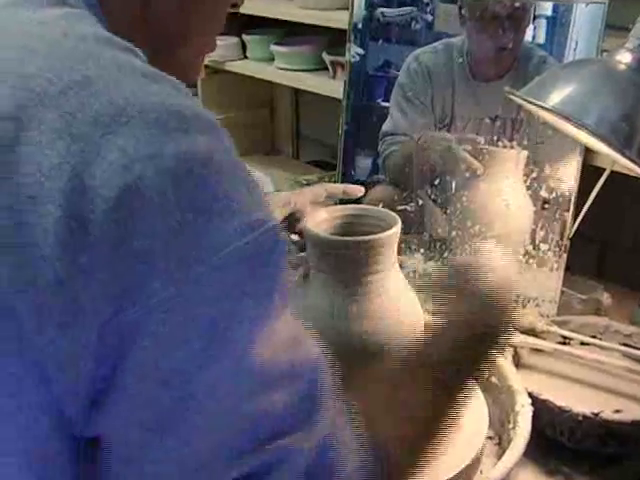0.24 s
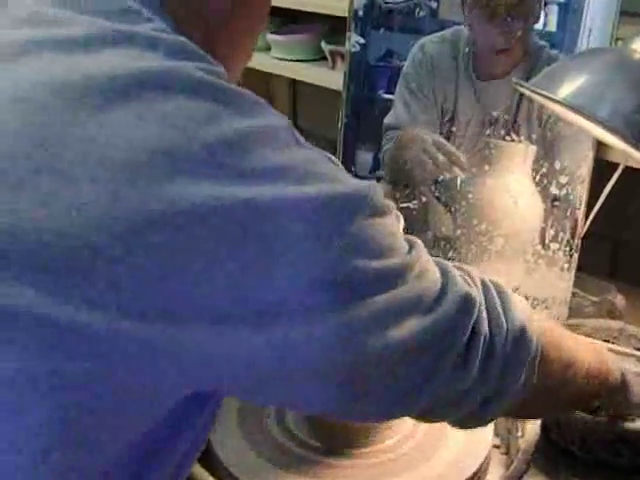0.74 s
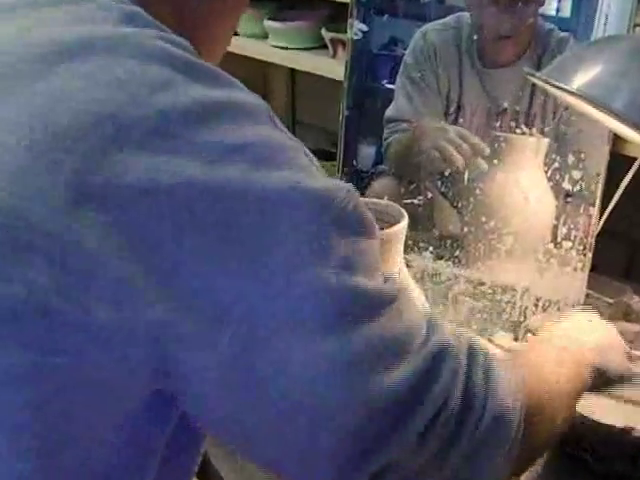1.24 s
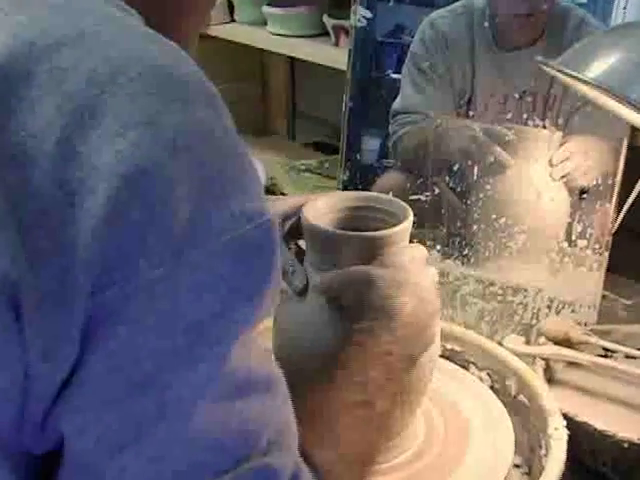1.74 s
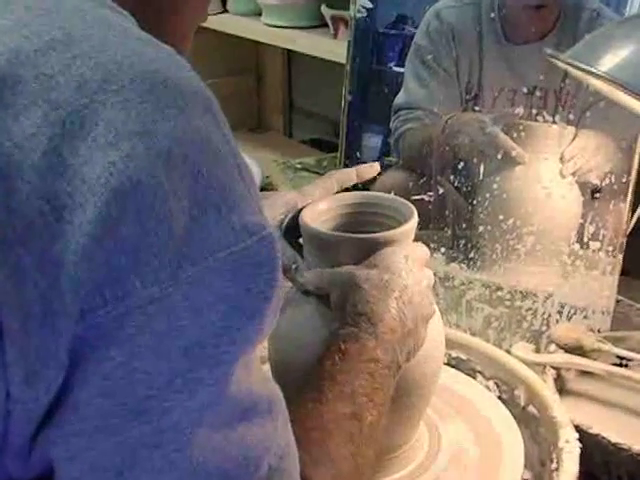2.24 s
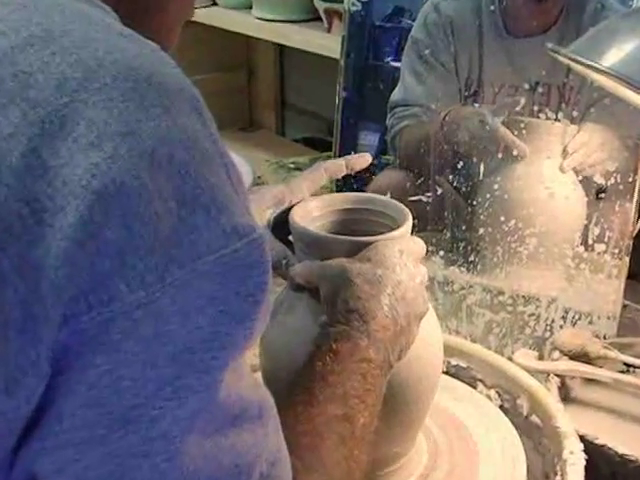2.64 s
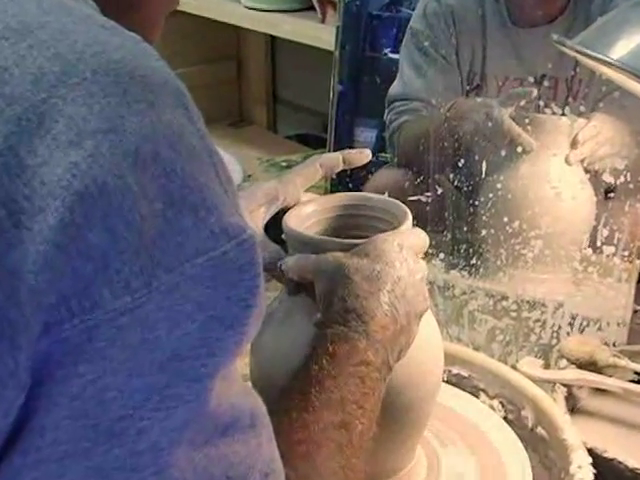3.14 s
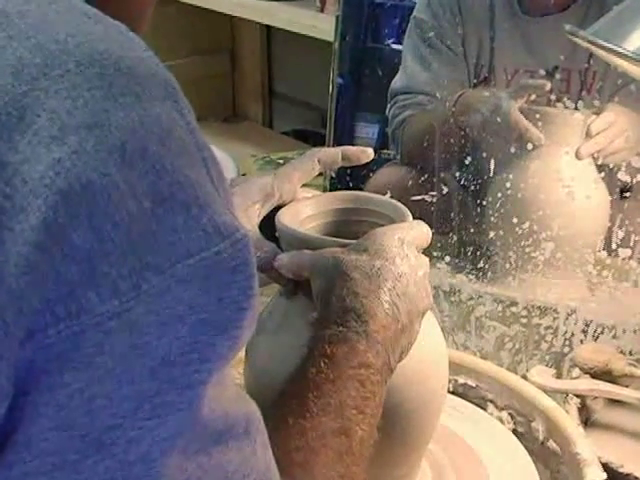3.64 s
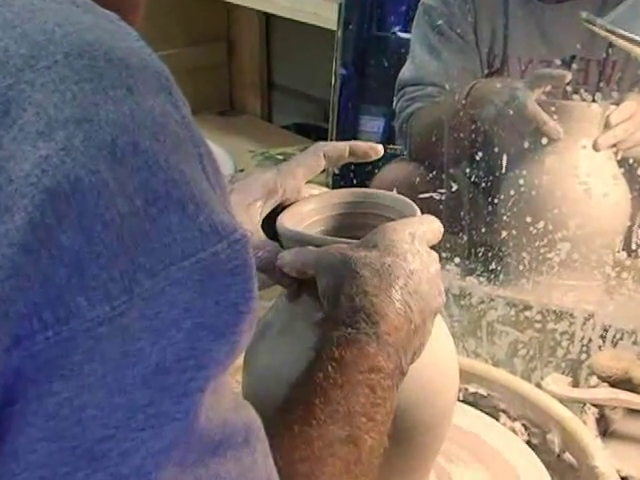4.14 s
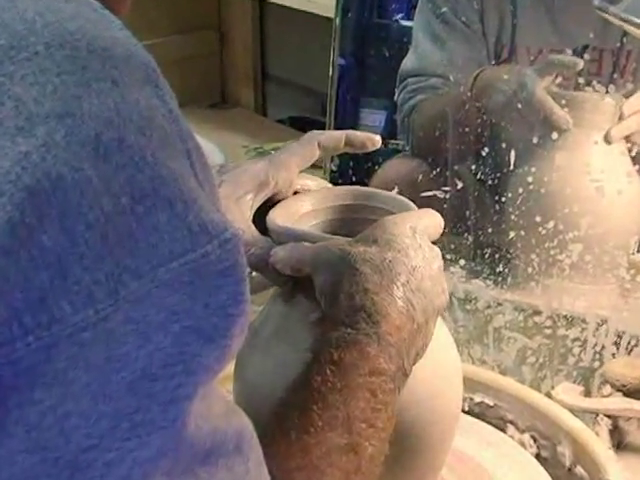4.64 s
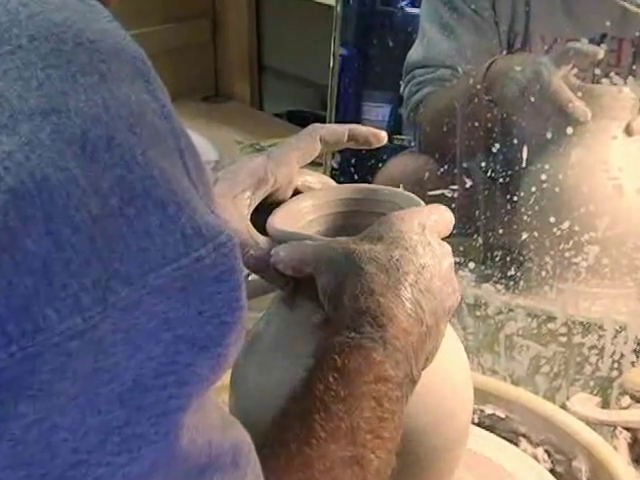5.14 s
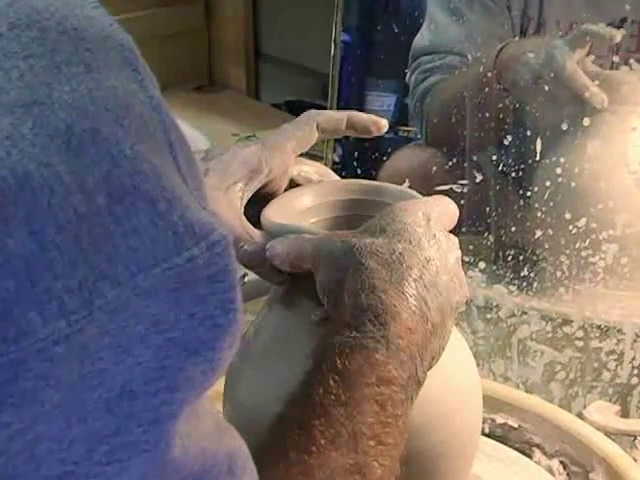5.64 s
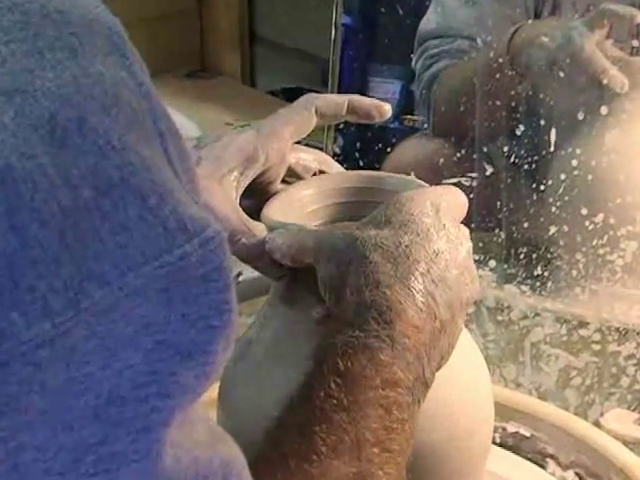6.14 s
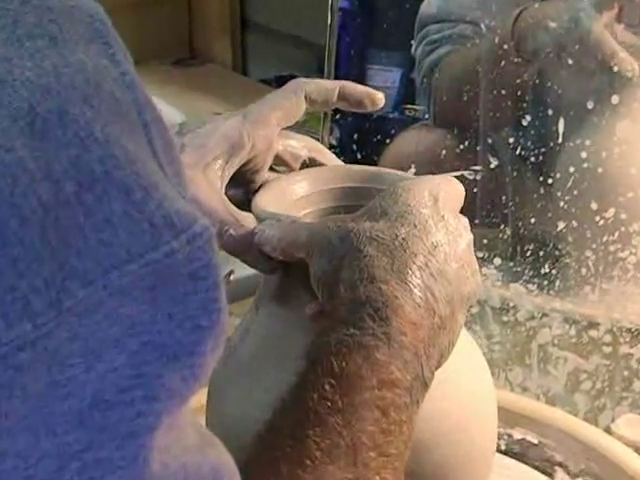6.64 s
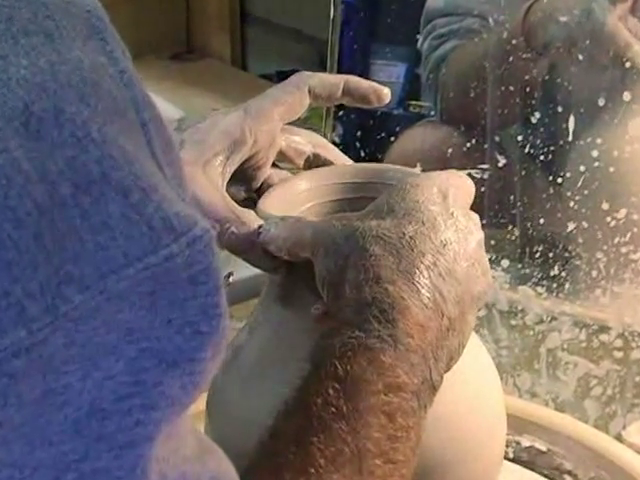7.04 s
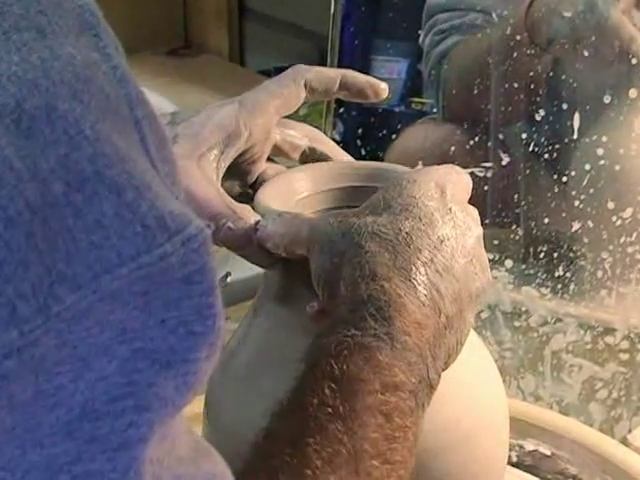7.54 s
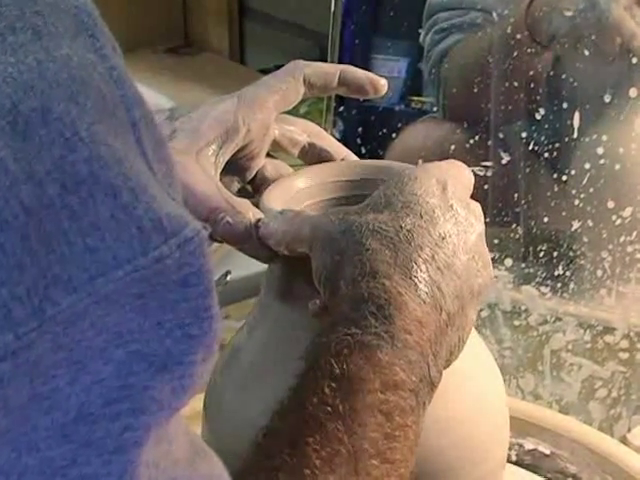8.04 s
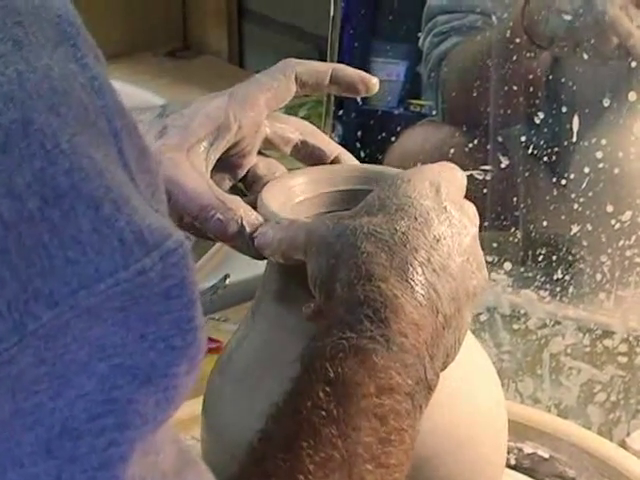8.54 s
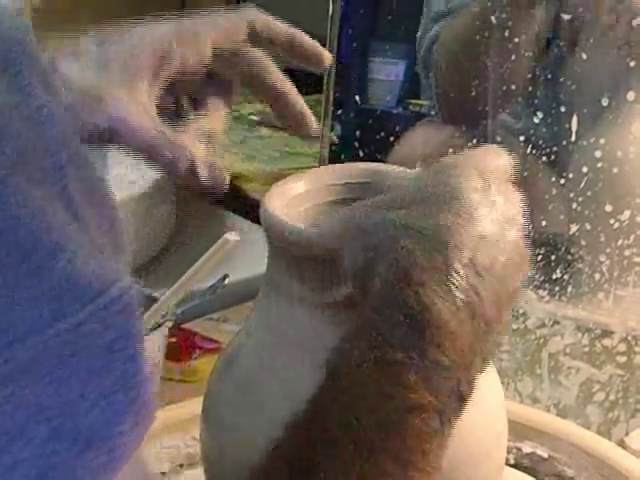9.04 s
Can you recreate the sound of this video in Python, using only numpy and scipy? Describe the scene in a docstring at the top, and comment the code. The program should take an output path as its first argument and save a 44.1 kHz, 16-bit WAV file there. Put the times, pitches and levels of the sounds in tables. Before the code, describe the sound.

Constant low motor hum and gentle belt rumble in a small studio, with brief cloth rustles, two dull wooden knocks early and tiny wet clicks.

```python
"""A steady hum and rumble fill a small studio, with a rustle of cloth, two knocks and soft wet ticks.
An electric potter's wheel makes the hum: its motor sings on multiples of twice the mains frequency.
Its drive shakes the frame, which now and then shudders; belt and bearings add a broad rush.
The potter leans aside and back with rustling sleeves, knocks a wooden tool and touches wet clay.
A tape camera close by adds hiss, a faint whine and a soft chirr."""
import sys
import numpy as np
from scipy.fft import rfft, irfft, next_fast_len
from scipy.io import wavfile
from scipy.ndimage import map_coordinates

SR = 44100
rng = np.random.default_rng(int(sys.argv[2]) if len(sys.argv) > 2 else 0)


def generate_wav(signal):
    """Clip the signal to [-1, 1] and save it as 16-bit WAV at the path in sys.argv[1]."""
    frames = np.transpose(np.atleast_2d(signal))
    scaled = np.clip(frames, -1, 1) * 32767
    pcm = np.round(scaled).astype(np.int16)
    wavfile.write(sys.argv[1], SR, pcm)


N = 409248

# the potter leans out to the side and back: t/s, lean (0 to 1)
LEAN = [(.1, 0), (.7, 0.74), (1.1, 0.89), (1.45, 0.66), (1.8, 0)]
# the wheel judders in its frame: t/s, ring level/dB before a shared trim, bell width/s, hum change/dB
JUDDER = [(1.09, -46, 0.02, 1.5), (1.963, -46, 0.067, -1), (2.31, -48, 0.013, 3.5), (3.59, -45, 0.037, -2),
          (4.063, -51, 0.033, -1.5), (4.49, -48, .012, -3.5), (4.528, -51, 0.011, 4), (5.878, -47, .05, 0),
          (8.5, -44, 0.074, -1)]


def amp(db):
    """Turn decibels into gain."""
    return 10 ** (np.asarray(db) / 20)


def unit(x):
    """Scale to rms 1."""
    return x / np.sqrt(np.mean(x ** 2) + 1e-20)


def clock():
    """Time of each sample in seconds."""
    return np.arange(N) / SR


def along(points, hz):
    """Gain read from (f/Hz, level/dB) points joined on a log frequency axis."""
    f, db = np.transpose(points)
    return amp(np.interp(np.log(hz + 1), np.log(f + 1), db))


def curves(rows):
    """One value per sample for each column after the time."""
    s, *cols = np.transpose(rows)
    return [np.interp(clock(), s, c) for c in cols]


def wobble(rate):
    """A smooth random curve with the given number of knots a second."""
    knots = rng.standard_normal(int(N * rate / SR) + 4)
    return map_coordinates(knots, [clock() * rate])


def filtered(x, response):
    """Filter x by a gain that depends on frequency."""
    m = next_fast_len(N + SR // 2)  # spare room at the end
    spectrum = rfft(x, m) * response(np.fft.rfftfreq(m, 1 / SR))
    return irfft(spectrum, m)[:N]


def noise(response):
    """Noise whose density per Hz is the response."""
    return filtered(rng.standard_normal(N) * np.sqrt(SR / 2), response)


def hump(hz, centre, width):
    """Gain of a resonance: 1 at the centre, half of that one width away."""
    return 1 / (1 + ((hz - centre) / width) ** 2)


def tone(hz):
    """A sine of rms 1 and random phase."""
    return np.sqrt(2) * np.sin(2 * np.pi * (hz * clock() + rng.random()))


def swells(rows):
    """Sum of bell-shaped envelopes from (t/s, level/dB, width/s) rows."""
    return sum(amp(db) * np.exp(-.5 * ((clock() - s) / width) ** 2) for s, db, width in rows)


def surges():
    """Level change of the hum in dB while the wheel judders."""
    return sum(change_db * swells([(s, 0, width)]) for s, _, width, change_db in JUDDER)


def motor(mid_db=3.5, upper_db=3.5, main_db=0.86, flutter_db=.25, waver_db=.5, wander_db=0.5):
    """Iron flexes twice a mains cycle; the housing favours its harmonics 2, 8 and 11, leaning lifts 2 and 8."""
    # slow drift of the main hum: t/s, level/dB before the changes below
    hum_drift = [(0, -40), (1.7, -39), (2.8, -41.5), (4, -40.5), (4.3, -40.5), (6.7, -38.5), (9, -38.4),
                 (9.28, -41)]
    # highest strong line: t/s, level/dB before the changes below
    top_line = [(0, -67.5), (.3, -66.5), (.7, -69.5), (1.55, -67), (2.5, -66.5), (4.3, -70), (7.8, -69.5),
                (9, -66.5), (9.28, -71.5)]
    # weaker lines: multiple of twice the mains, level/dB against the mean of the two upper lines
    buzz_lines = [(6, -4.5), (7, -1.5), (12, -14.5), (14, -17)]
    # steady low lines of motor and drive: f/Hz, level/dB rms before a slight waver
    drone_lines = [(30, -73), (36, -73.5), (59, -63.5), (90, -65.5), (120, -65.5), (183, -69), (277, -65.5),
                   (360, -58), (480, -62.5)]
    flex_hz = 2 * 60  # twice the mains frequency
    lean_hum_db, lean_mid_db = 3.5, 5  # leaning opens the path from the motor
    (lean,), (hum_db,), (top_db,) = curves(LEAN), curves(hum_drift), curves(top_line)

    dip_db = -5 * swells([(2.85, 0, .07)])  # the upper lines dip briefly
    mid_line_db = -68.5 + lean_mid_db * lean + dip_db
    top_db = top_db + dip_db + wander_db * wobble(3.9)

    def line(db, order):
        """One harmonic of the flexing at a changing level."""
        return amp(db) * tone(order * flex_hz)

    hum_db = hum_db + lean_hum_db * lean + surges() + main_db + flutter_db * wobble(20)
    hum = line(hum_db, order=2)
    middle = line(mid_line_db + mid_db + waver_db * wobble(4.3), order=8)
    top = line(top_db + upper_db + waver_db * wobble(5), order=11)
    mean_db = (mid_line_db + top_db) / 2
    buzz = sum(line(mean_db + db + waver_db * wobble(7), round(k)) for k, db in buzz_lines)
    drone = sum(amp(db + waver_db * wobble(12)) * tone(hz) for hz, db in drone_lines)
    return hum + middle + top + buzz + drone


def turning(turn_hz=2.3, peak_s=.16):
    """Swings from 1 to -1 and back once in each turn of the wheel."""
    return np.cos(2 * np.pi * turn_hz * (clock() - peak_s))


def standing_waves(hz, spacing_hz=16, ripple_db=2.27):
    """The small room lifts some frequencies and hollows out their neighbours."""
    knots = rng.standard_normal(SR // 4)
    return amp(ripple_db * map_coordinates(knots, [hz / spacing_hz], mode="wrap"))


def drive(turn_db=0.55, rush_turn_db=0.44, uneven_db=0.95, grit_db=1.1):
    """Belt and bearings shake the frame, harder once a turn; their rush opens up as the potter leans."""
    # the drive bumps and shakes the frame harder: t/s, added gain/dB against the steady 1, bell width/s
    bumps = [(1.96, -1.5, .05), (2.31, -9, 0.02), (6.3, -10, 0.061)]
    # resonances of frame, wheel head and splash pan: f/Hz, width/Hz, density/dB per Hz against the rumble
    resonances = [(68.3, 17.7, -21.5), (119.5, 12, -28.5), (221.8, 32.5, -20), (267, 19, -21.5),
                  (340.7, 16.8, -15), (416.5, 22, -29.5), (485, 35, -30.5), (588.5, 11.9, -20.5),
                  (623, 23, -27.5), (1140, 9.2, -53), (1315.5, 14, -38.5)]
    # broad rush of belt and bearings: f/Hz, density/dB per Hz against the rush level
    rush_colour = [(15, -40), (45, -30), (165, -26.5), (400, -25.5), (800, -29), (1000, -34), (1330, -36),
                   (1520, -39.5), (1850, -44), (2250, -46.5), (3000, -55), (4500, -71)]
    # level of the rush: t/s, level/dB before lean, turning and grit
    rush_level = [(0, -60), (2.6, -59.5), (4, -61), (5.6, -61.5), (7.3, -60.5), (9.28, -61)]
    rumble_db, lean_rumble_db, lean_rush_db = -51.5, -0.5, 2.5
    (lean,), (rush_db,) = curves(LEAN), curves(rush_level)

    load = amp(turn_db * turning() + uneven_db * wobble(12)) * (1 + swells(bumps))
    frame = noise(lambda hz: np.sqrt(sum((amp(db) * hump(hz, c, w)) ** 2 for c, w, db in resonances)))
    rumble = load * amp(rumble_db + lean_rumble_db * lean) * frame

    rush = noise(lambda hz: along(rush_colour, hz) * standing_waves(hz))
    rush_db = rush_db + lean_rush_db * lean + rush_turn_db * turning() + grit_db * wobble(18)
    return rumble + amp(rush_db) * rush


def camera(chirr_db=-83.5, low_hz=5620, high_hz=6420, chirr_width_hz=330,
           reel_hz=10.0, roller_hz=9.6, depth_db=2.5):
    """Microphone hiss, the whine of the tape drive and a soft chirr from two small turning parts."""
    # microphone hiss: f/Hz, density/dB per Hz
    hiss_colour = [(1000, -120), (3700, -117), (5000, -115), (6200, -113.5), (8000, -114.5), (12100, -115),
                   (12600, -121), (12900, -135)]
    # whine of the tape drive: f/Hz, level/dB rms
    whine_lines = [(2697, -90.5), (5394, -81.5), (5696, -97), (6293, -89), (6743, -89), (7192, -93),
                   (7642, -95), (8092, -88), (9441, -93), (10789, -88)]
    hiss = noise(lambda hz: along(hiss_colour, hz))
    whine = sum(amp(db) * tone(hz) for hz, db in whine_lines)
    # each part rubs once a turn and, more strongly, twice a turn
    rub = sum(.5 * tone(hz) + tone(2 * hz) for hz in (reel_hz, roller_hz))

    def shell(hz):
        """Two resonances that colour the chirr."""
        return np.hypot(hump(hz, low_hz, chirr_width_hz), hump(hz, high_hz, chirr_width_hz))

    chirr = unit(noise(shell) * amp(depth_db * rub))
    return hiss + whine + amp(chirr_db) * chirr


def sleeve(grain_db=1.4, catch_db=0.9, pivot_hz=3000):
    """Cloth slides over cloth in many tiny catches; each stroke swells and fades with its own brightness."""
    # sleeve strokes: t/s, level/dB rms at the height before the catches, width/s, brightness/dB per octave
    strokes = [(.08, -71.5, 0.021, -2), (0.285, -61.5, 0.025, 1), (1.1, -78, .065, 1),
               (1.467, -65.5, .033, -1), (1.643, -69.5, .085, 2.5), (3.07, -70, .021, -3),
               (6.08, -72, .035, -4), (9.09, -68, .02, 0), (9.205, -62, 0.053, -1)]
    # colour of the cloth: f/Hz, level/dB
    cloth_colour = [(500, -15), (1500, 5.5), (2200, 4.5), (3500, -2.5), (6000, -4), (8500, -12.5),
                    (12500, -16)]
    out = np.zeros(N)
    for s, db, width, tilt_db in strokes:
        def colour(hz):
            """The cloth's colour, tilted around the pivot."""
            octaves = np.log2(np.maximum(hz, 500) / pivot_hz)
            return along(cloth_colour, hz) * amp(tilt_db * octaves)

        swell = 1 / np.cosh(np.clip((clock() - s) / width, -20, 20))
        out += amp(db) * unit(noise(colour)) * swell
    catches = unit(amp(grain_db * wobble(300) + catch_db * wobble(50)))
    return out * catches


def knocks(click_hz=2300, click_width_hz=650, click_t60=.035, thud_hz=480, thud_width_hz=220, thud_t60=0.088):
    """A light wooden tool is knocked: a dull click, a short ring and a thud of the bench."""
    # knocks as the hand takes up a tool: t/s, base level/dB, click/dB and low thud/dB against the base
    blows = [(0.471, -51, -8, -4), (.669, -54, -5, 8)]
    # ring of the tool: f/Hz, level/dB against the base, time to fall 60 dB/s
    tool_modes = [(520, -3, 0.067), (720, -3, .06), (1510, 1, 0.053), (1690, -3, .05), (2140, -12, 0.036),
                  (2490, -13, .04), (2910, -11, 0.044)]
    ring, click, thud = np.zeros((3, N))
    for s, db, click_db, thud_db in blows:
        t = np.maximum(clock() - s, 0)
        blow = amp(db) * (1 - np.exp(-t / 0.0005))  # silent before the knock, then a fast rise
        for hz, level, t60 in tool_modes:
            wave = np.sin(2 * np.pi * (hz * t + rng.random()))
            ring += blow * amp(level - 60 * t / t60) * wave
        click += blow * amp(click_db - 60 * t / click_t60)
        thud += blow * amp(thud_db - 60 * t / thud_t60)
    click_noise = unit(noise(lambda hz: hump(hz, click_hz, click_width_hz)))
    thud_noise = unit(noise(lambda hz: hump(hz, thud_hz, thud_width_hz)))
    return ring + click * click_noise + thud * thud_noise


def judder(ring_hz=238, width_hz=32, level_db=-2):
    """Brief shudders ring the frame close to the hum and beat against it."""
    shudders = swells([(s, db, width) for s, db, width, _ in JUDDER])
    return amp(level_db) * shudders * unit(noise(lambda hz: hump(hz, ring_hz, width_hz)))


def ticks(attack_s=0.0016, smack_db=-3, smack_hz=2400, smack_width_hz=2200):
    """Each wet contact is a quickly dying burst around its own pitch, over a weaker broad smack."""
    # fingers on wet clay: t/s, level/dB before attack and decay, f/Hz, width/octaves, time to fall 60 dB/s
    contacts = [(1.264, -63, 9050, .07, 0.061), (2.969, -70, 2200, .6, 0.066), (4.064, -67, 2600, .18, 0.1),
                (5.069, -67, 2400, .2, .1), (6.24, -63, 6400, .22, 0.11), (7.12, -58, 6570, 0.3, 0.096),
                (8.142, -65, 2950, 0.1, 0.18), (8.484, -62, 6620, 0.24, .09), (8.785, -70, 5000, .5, .13)]
    out = np.zeros(N + SR)
    t = np.arange(SR // 4) / SR
    hz = np.fft.rfftfreq(len(t), 1 / SR) + 1  # the 1 keeps the logarithm finite
    for s, db, pitch, octaves, t60 in contacts:
        own = np.exp(-.5 * (np.log2(hz / pitch) / octaves) ** 2)
        smack = amp(smack_db) * np.sqrt(abs(octaves)) * hump(hz, smack_hz, smack_width_hz)
        burst = unit(irfft(rfft(rng.standard_normal(len(t))) * (own + smack), len(t)))
        envelope = amp(db - 60 * t / t60) * (1 - np.exp(-t / attack_s))
        out[round(s * SR):][:len(t)] += burst * envelope
    return out[:N]


def scene():
    """Wheel, potter and camera in one channel."""
    wheel = motor() + drive() + judder()
    potter = sleeve() + knocks() + ticks()
    return (wheel + potter + camera())[None]


def record(dry, even_depth=0.61, odd_depth=0.35, notch_width_hz=13, comb_hz=299.7, top_hz=12860):
    """The camera cuts a comb of narrow notches, every second one deeper, and keeps nothing from top_hz up."""
    def response(hz):
        """Gain of the notches and the band limit."""
        tooth = np.maximum(np.round(hz / comb_hz), 1)  # number of the nearest notch
        depth = np.minimum(np.where(tooth % 2, odd_depth, even_depth), 1)
        notches = 1 - depth * hump(hz, tooth * comb_hz, notch_width_hz)
        return notches * (hz < top_hz)
    return filtered(dry[0], response)[None]


dry = scene()
out = record(dry)
generate_wav(out)
```